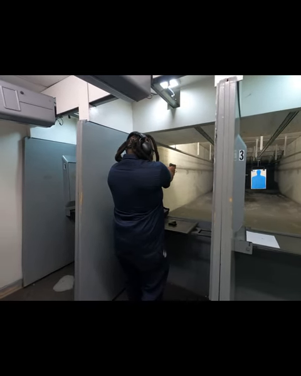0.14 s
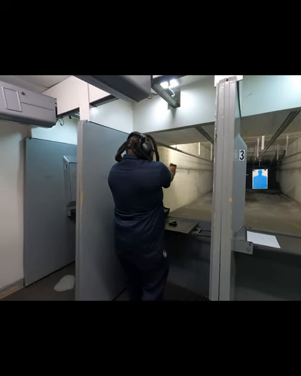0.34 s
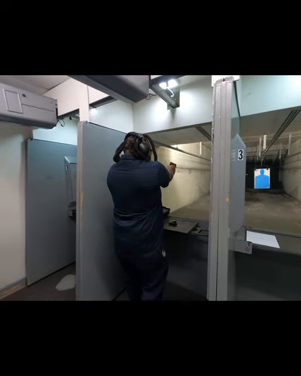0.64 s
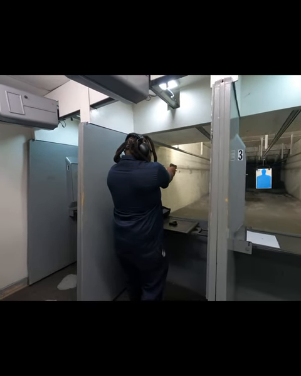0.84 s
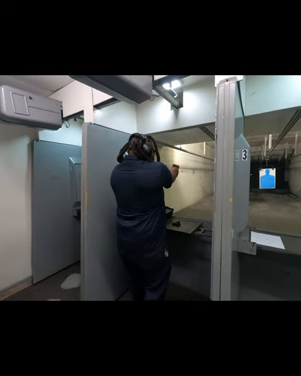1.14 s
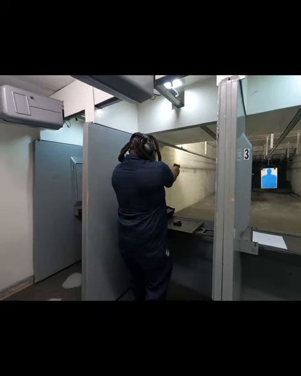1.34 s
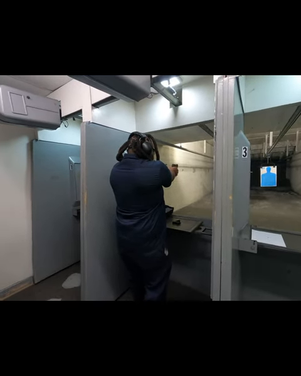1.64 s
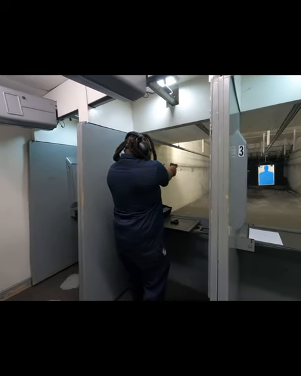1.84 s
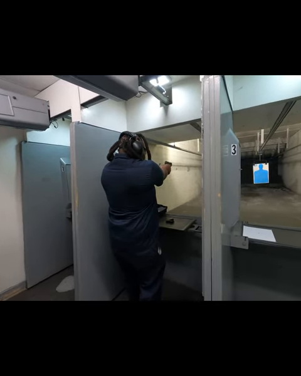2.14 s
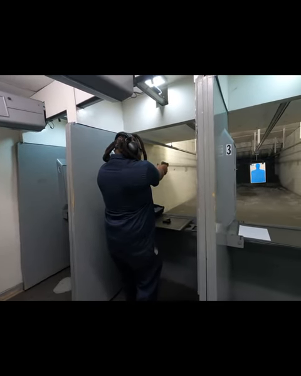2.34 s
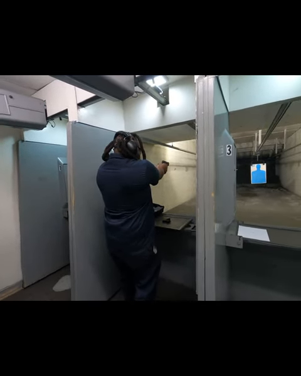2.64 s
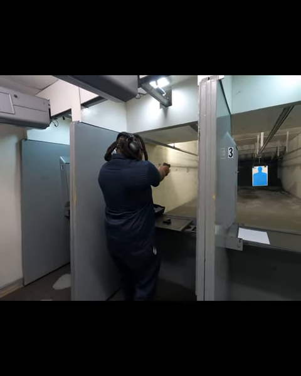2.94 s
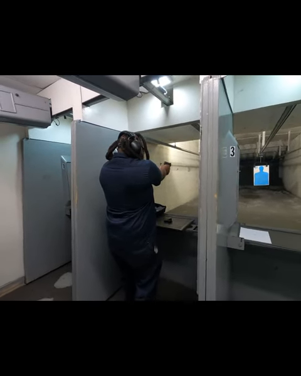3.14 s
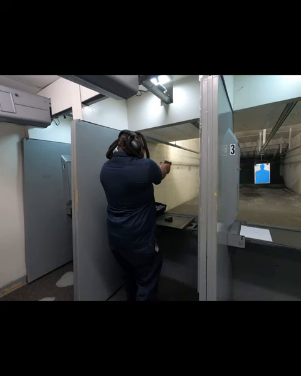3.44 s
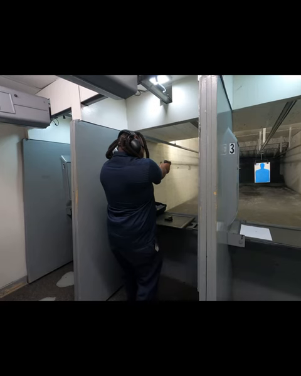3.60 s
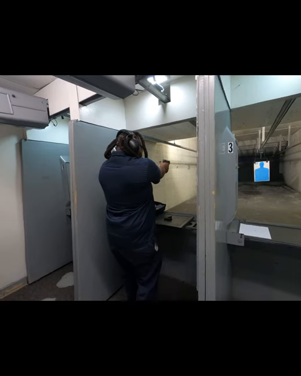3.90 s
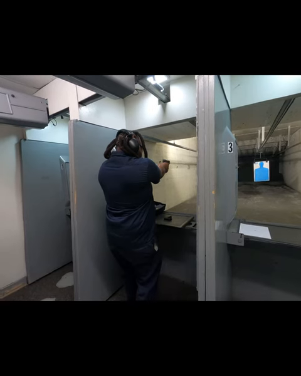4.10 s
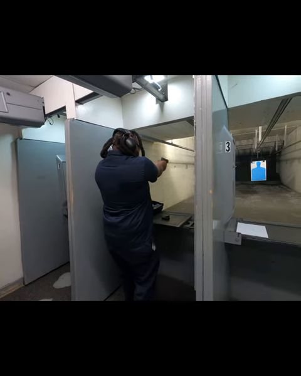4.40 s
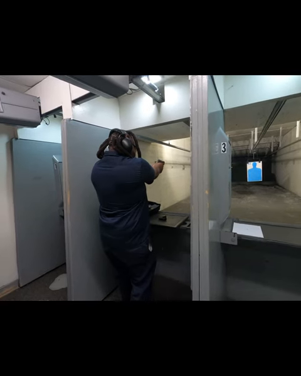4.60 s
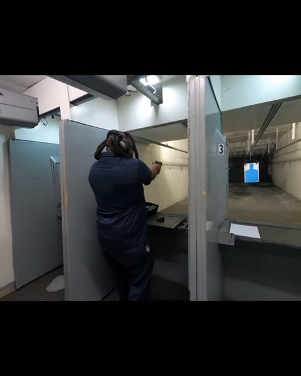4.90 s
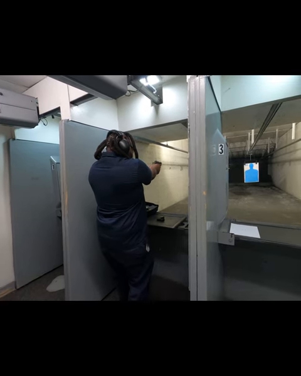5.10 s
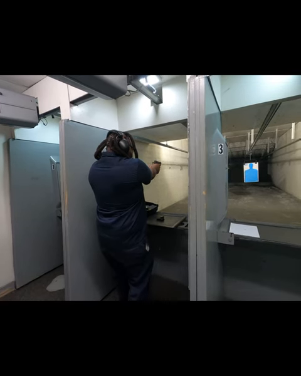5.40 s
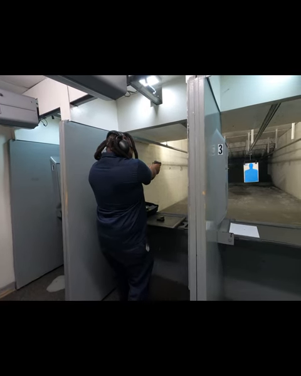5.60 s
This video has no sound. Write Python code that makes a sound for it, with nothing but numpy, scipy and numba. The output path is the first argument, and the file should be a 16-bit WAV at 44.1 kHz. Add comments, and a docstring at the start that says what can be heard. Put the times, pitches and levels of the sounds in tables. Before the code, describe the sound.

Inside a hard-walled shooting range, fans hum beneath a decaying gunshot echo. Brass clacks nearby, then a handgun cracks three times at a steady, slow pace. Each blast slaps off the booth, booms back from the far end and rings down the lanes, nearly covering faint landings of spent cases. The nearby microphone compresses and rounds off the peaks, and the image narrows from wide to almost mono after the first crack.

```python
"""An earlier pistol shot is still dying away in an indoor range while the ventilation hums underneath. A spent
case clacks down, then three more shots follow about two seconds apart, with fainter cases around them. Each
shot is a crack of shaped noise, with a short rush leading into it; fading noise forms the booth slap, far-end
boom and hall ring. The stereo image starts wide and closes early on; gain control and soft overload flatten the
blasts."""
import sys
import numpy as np
from scipy import signal
from scipy.fft import rfft, irfft
from scipy.io import wavfile
from numba import njit

SR = 44100
rng = np.random.default_rng(int(sys.argv[2]) if len(sys.argv) > 2 else 0)


def unload_audio(sound):
    """Save the sound as a 16-bit wav file, at the path given as the first command line argument."""
    columns = np.transpose(np.atleast_2d(sound))
    # keep every value between -1 and 1, then stretch to whole-number steps
    steps = np.round(np.clip(columns, -1, 1) * 32767)
    wavfile.write(sys.argv[1], SR, steps.astype(np.int16))


N = 253575  # length in samples
TAIL = 5 * SR // 2  # length of the room's answer in samples
TAIL_TIME = np.arange(TAIL) / SR  # seconds since the shot
FAR_END_S = .089  # delay of the answer from the far end


def undb(db):
    """Turn decibels into a gain."""
    return 10 ** (np.asarray(db) / 20)


def at(points, hz):
    """Read a curve of (Hz, value) points, spacing the frequencies logarithmically."""
    point_hz, value = np.transpose(points)
    return np.interp(np.log(np.maximum(hz, 1)), np.log(point_hz), value)


def bins(size):
    """List the frequencies in the spectrum of a sound of size samples."""
    return np.arange(size // 2 + 1) * SR / size


# How wide the noise sounds, before the image narrows.
# Each row: frequency in Hz, side level compared with mid in dB.
WIDTH = [(60, -5), (250, -13), (600, -11), (1200, -7), (2500, -4), (7000, -2)]


def noise(spectrum, size):
    """Random hiss coloured by a spectrum in dB per Hz, as a mid and a side signal."""
    hz = bins(size)
    mid_and_side = np.array([np.ones(len(hz)), undb(at(WIDTH, hz))])
    colour = undb(at(spectrum, hz)) * mid_and_side
    white = rfft(rng.standard_normal((2, size)))
    return irfft(white * colour * np.sqrt(SR / 2), size)


def fade(t, t60):
    """Silent before t = 0, then dying away exponentially by 60 dB in t60 seconds."""
    return (t >= 0) * np.exp(-np.log(1000) * np.maximum(t, 0) / t60)


def add(out, sound, s):
    """Mix in a sound that starts at s seconds, cutting off what falls outside."""
    start = int(s * SR)
    first, last = max(start, 0), min(start + sound.shape[1], N)
    if last > first:
        out[:, first:last] += sound[:, first - start:last - start]


# Standing waves between the walls, and the gaps between them.
# Each row: frequency in Hz, width in Hz, boost or cut in dB.
STANDING_WAVES = [(125, 10, -6), (169, 8, 6), (193, 12, -5), (222, 10, 2), (252, 8, 4), (275, 10, 1),
                  (298, 9, 3), (332, 14, -7), (364, 8, 3), (388, 9, -5), (409, 8, 6), (465, 20, -2),
                  (527, 8, 4), (570, 16, -2), (612, 8, 4), (665, 14, 2), (1140, 12, 4)]


def room_field(spectrum, size):
    """Spectrum of dense reflections; waves that fit between the walls are stronger, the gaps weaker."""
    hz = bins(size)
    ripple_db = sum(db * np.exp(-((hz - f) / width) ** 2) for f, width, db in STANDING_WAVES)
    return rfft(noise(spectrum, size)) * undb(ripple_db)


# Echoes between pairs of facing walls: first across the lanes, then along them.
# Each row: first return in seconds, round trip in seconds, swell in dB before it is offset and fades.
FLUTTER_ECHOES = [(.0588, .0512, 2.6), (.185, .2052, 2)]


def flutter(t, width_s=.015, life_s=1.6, between_db=-1):
    """Swell in dB at each return of the blast between facing walls; it fades as the sound scatters."""
    swell_db = between_db
    for first_s, trip_s, db in FLUTTER_ECHOES:
        trips = np.maximum(np.round((t - first_s) / trip_s), 0)
        from_nearest_s = t - first_s - trips * trip_s
        swell_db = swell_db + db * np.exp(-(from_nearest_s / width_s) ** 2)
    return swell_db * np.exp(-t / life_s)


# Starting colour of the reflections off the booth walls, before swells and levels.
# Each row: frequency in Hz, density in dB per Hz.
BOOTH_COLOUR = [(20, -45), (35, -44), (70, -31), (160, -30), (270, -28.5), (450, -33.5), (700, -35),
                (1200, -40), (1800, -44), (3000, -50.5), (5000, -56), (9000, -65), (11000, -76),
                (15500, -88)]


def booth_slap():
    """The nearby booth walls answer at once with dense reflections that die quickly."""
    level = undb(flutter(TAIL_TIME) + 1.5)
    return irfft(room_field(BOOTH_COLOUR, TAIL)) * fade(TAIL_TIME, .45) * level


# Colour of the far end's boom, before its build-up, swells and levels.
# Each row: frequency in Hz, density in dB per Hz.
BOOM_COLOUR = [(20, -47), (35, -44), (70, -31.5), (160, -30), (270, -27), (450, -33), (700, -34),
               (1300, -45), (3000, -66), (6000, -90), (15000, -120)]


def far_end_boom():
    """The far end answers late; its reflections pile up over a few hundredths of a second."""
    since_s = TAIL_TIME - FAR_END_S
    build = 1 - fade(np.maximum(since_s, 0), .12)
    level = undb(flutter(TAIL_TIME) + .5)
    return irfft(room_field(BOOM_COLOUR, TAIL)) * build * fade(since_s, .72) * level


# Starting colour of the ring in the concrete hall, before swells and levels.
# Each row: frequency in Hz, density in dB per Hz.
HALL_COLOUR = [(30, -80), (110, -67), (170, -55), (250, -42), (420, -44.7), (750, -39.5), (1100, -40),
               (1500, -48.2), (2400, -50.7), (4200, -58.2), (6500, -66.5), (8700, -64), (10200, -74.5),
               (13000, -81.5), (15500, -92)]
# How long the hall rings.
# Each row: frequency in Hz, time to die away by 60 dB in seconds.
HALL_DECAY = [(100, 4), (250, 3.7), (800, 3.6), (1500, 3.25), (2300, 2.7), (3200, 2.25), (4200, 1.92),
              (6000, 1.43), (8600, 1.1), (11000, .88), (15000, .8)]


def hall_ring():
    """The hall rings long; air soaks up the treble, so each band of pitch dies at its own pace."""
    field, hall = room_field(HALL_COLOUR, TAIL), 0
    swell_db = flutter(TAIL_TIME)
    centres = np.geomspace(500, 14000, 12)  # the outer bands also hold all that lies beyond
    for hz, share in zip(centres, np.eye(len(centres))):
        band = irfft(field * at(np.c_[centres, share], bins(TAIL)))
        # baffles scatter the treble, so only lows come back as distinct echoes
        band_swell_db = swell_db / (1 + (hz / 1500) ** 2)
        hall = hall + band * fade(TAIL_TIME, at(HALL_DECAY, hz)) * undb(band_swell_db)
    return hall


# Colour of the rush into the crack, before its swell and the shot's own rush level.
# Each row: frequency in Hz, density in dB per Hz.
RUSH_COLOUR = [(50, -52), (400, -47), (1000, -44), (1600, -46), (3000, -56), (4500, -54), (6500, -68),
               (9300, -60), (11500, -76), (15500, -88)]


def rush(t):
    """A short burst of noise that grows up to its very end."""
    dying = noise(RUSH_COLOUR, len(t)) * np.exp(-(t / .018) ** 2)
    return dying[:, ::-1]  # turned round in time


# Starting colour of the muzzle crack, before the shot's own crack level.
# Each row: frequency in Hz, density in dB per Hz.
CRACK_COLOUR = [(60, -48), (400, -34), (1100, -27), (2000, -40), (3300, -32), (4200, -42), (6000, -51),
                (9000, -51), (11000, -65), (16000, -78)]


def muzzle_crack(t):
    """A burst of noise that starts at full strength and dies within hundredths of a second."""
    return noise(CRACK_COLOUR, len(t)) * fade(t, .034)


# The pistol shots; the first is over before the sound begins, leaving only its tail.
# Each row: time in seconds, room level in dB, crack level in dB, early reflections in dB, rush level in dB.
PISTOL_SHOTS = [(-1.2, -.4, 0, 0, -20), (.5793, -1.7, 1.5, -8, -14), (2.5293, .5, -2.5, 0, -.5),
                (4.408, .5, -2.5, 0, -1.5)]


def pistol():
    """A short rush leads into each muzzle crack, then the room answers, the same room every time."""
    out = np.zeros((2, N))
    booth, far, hall = booth_slap(), far_end_boom(), hall_ring()
    burst_time = np.arange(SR // 10) / SR
    # 1 at first, sliding to 0 as the far end answers: weak early reflections leave a dip until then
    early = np.clip(.5 + (FAR_END_S - TAIL_TIME) / .04, 0, 1)
    for s, room_db, crack_db, early_db, rush_db in PISTOL_SHOTS:
        room = booth * undb(early_db) + far + hall * undb(.45 * early_db * early)
        add(out, undb(room_db) * room, s)
        add(out, undb(crack_db) * muzzle_crack(burst_time), s)
        add(out, undb(rush_db) * rush(burst_time), s - len(burst_time) / SR)  # ends at the crack
    return out


# Colour of the air rushing through the ducts, before the standing waves.
# Each row: frequency in Hz, density in dB per Hz.
AIR_COLOUR = [(25, -85), (70, -80), (120, -84), (240, -71), (400, -72), (800, -67), (1100, -70),
              (2000, -88), (4000, -115), (8000, -145), (15000, -146)]
# The hum of the fans.
# Each row: frequency in Hz, average (rms) level in dB.
FAN_HUM = [(247.6, -46), (371.4, -56), (662, -54)]


def ventilation(waver_hz=1.2, steady_db=4):
    """Air rushes through the ducts; each fan tone is a steady sine plus a weaker, wavering narrow noise."""
    hum, t = 0, np.arange(N) / SR
    for hz, db in FAN_HUM:
        narrow = 1 / (1 + ((bins(N) - hz) / waver_hz) ** 2)
        waver = irfft(rfft(rng.standard_normal(N)) * narrow, N)
        steady = np.sqrt(2) * np.sin(2 * np.pi * hz * t)
        tone = waver / waver.std() + undb(steady_db) * steady
        hum = hum + undb(db) * tone / tone.std()
    return irfft(room_field(AIR_COLOUR, N), N) + hum * np.array([[1], [0]])  # hum in the centre only


# Starting colour of a case's clack, before the landing's own level.
# Each row: frequency in Hz, density in dB per Hz.
CLACK_COLOUR = [(500, -85), (1500, -63), (2600, -65), (3450, -59), (4000, -64), (4700, -63), (5800, -76),
                (8500, -76), (10500, -94), (15000, -106)]


def case_clack(t):
    """The knock of the landing is short noise; a fainter, longer tail is the hall it stirs."""
    return noise(CLACK_COLOUR, len(t)) * (fade(t, .2) + undb(-25) * fade(t, 1.3))


# Starting colour of the bright tick of a case's rim, before the landing's own level.
# Each row: frequency in Hz, density in dB per Hz.
RIM_COLOUR = [(3000, -104), (8000, -103), (10500, -108), (13500, -100), (15500, -106)]


def rim_tick(t):
    """The rim ticks brightly: treble noise that dies quickly."""
    return noise(RIM_COLOUR, len(t)) * fade(t, .2)


# The ringing tones of a brass case.
# Each row: frequency in Hz, level compared with the first tone in dB, time to die away by 60 dB in seconds.
BRASS_TONES = [(10930, 0, .3), (11040, -4, .2), (13060, -8, .25)]


def brass_ring(t):
    """The brass vibrates at a few high pitches, each a fading sine; the side gets half as much."""
    ring = sum(undb(db) * np.sin(2 * np.pi * hz * t) * fade(t, t60) for hz, db, t60 in BRASS_TONES)
    return ring * np.array([[1], [.5]])


# The spent cases landing.
# Each row: time in seconds, clack level in dB, ring level in dB, rim tick level in dB.
CASE_LANDINGS = [(.1177, -6, -88, -14), (1.36, -42, -63, -10), (2.341, -39, -105, -35),
                 (3.536, -25, -69, -5), (5.622, -29, -90, -13)]


def cases():
    """Spent brass lands on the booth or the floor: a clack, a faint rim tick and a very faint ring."""
    out, t = np.zeros((2, N)), np.arange(SR) / SR
    contact = 1 - fade(t, .006)  # softens the very start
    for s, clack_db, ring_db, rim_db in CASE_LANDINGS:
        landing = undb(clack_db) * case_clack(t)
        landing = landing + undb(rim_db) * rim_tick(t)
        landing = landing + undb(ring_db) * brass_ring(t)
        add(out, contact * landing, s)
    return out


def scene(narrow_from_s=.6, narrowing_s=.39, centred_side_db=-48):
    """Mix all sources into left and right; the image starts wide, then closes to the centre and stays."""
    mid, side = pistol() + ventilation() + cases()
    closing = np.maximum(np.arange(N) / SR - narrow_from_s, 0) / narrowing_s
    side = side * (np.exp(-closing ** 2) + undb(centred_side_db))
    return np.array([mid + side, mid - side])


@njit
def follow(power, attack, release):
    """Track the loudness, moving by one share of the gap per sample when rising, another when falling."""
    out, level = np.empty(len(power)), 0.
    for i in range(len(power)):
        level += (power[i] - level) * (attack if power[i] > level else release)
        out[i] = level
    return out


def record(dry, threshold_db=-12.3, ratio=2.6, attack_s=.008, release_s=.022, top_hz=15500):
    """Gain control holds the blasts down, the peaks overload softly, and the top is cut."""
    power = follow(np.mean(dry ** 2, axis=0), 1 / (attack_s * SR), 1 / (release_s * SR))
    excess = np.hypot(1, power / undb(threshold_db) ** 2)  # hypot makes the onset gradual
    loud = dry * excess ** ((1 / ratio - 1) / 2)
    rounded = .95 * loud / (1 + loud ** 4) ** .25  # peaks bend towards .95
    top_cut = signal.ellip(8, .2, 70, top_hz, fs=SR, output="sos")
    return signal.sosfilt(top_cut, rounded)


dry = scene()
out = record(dry)
unload_audio(out)
```